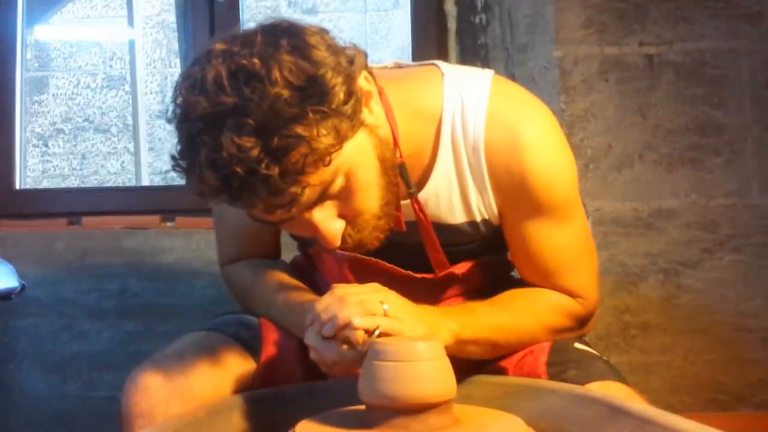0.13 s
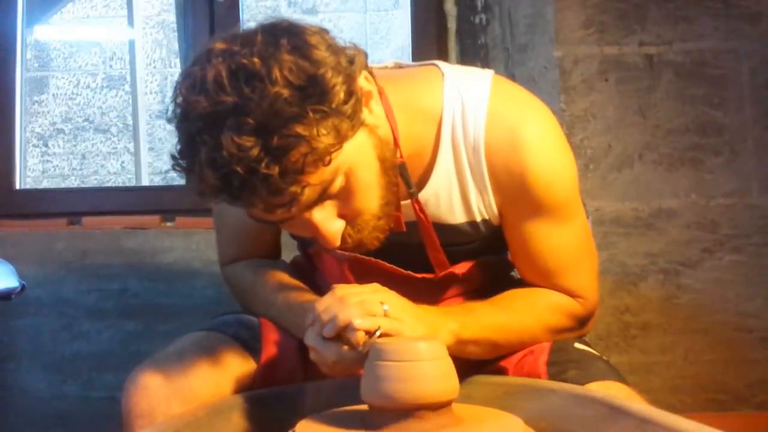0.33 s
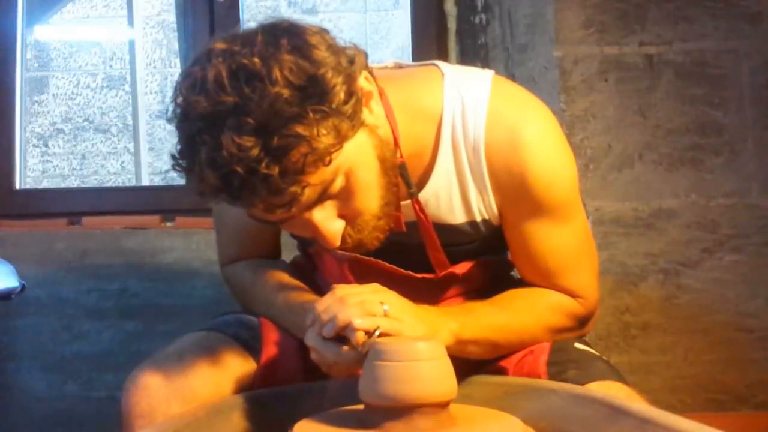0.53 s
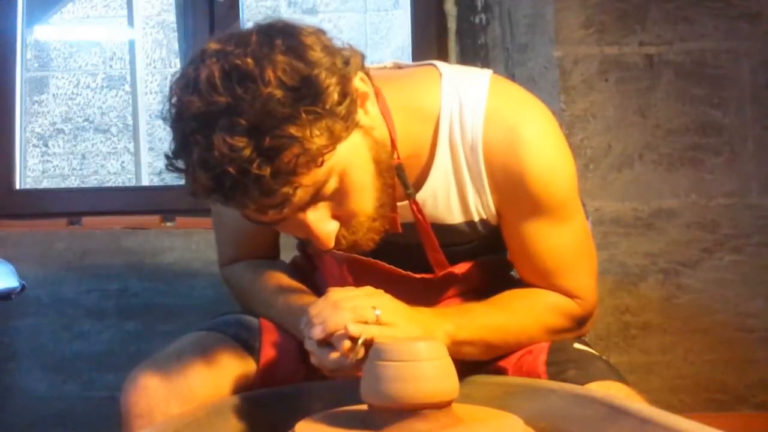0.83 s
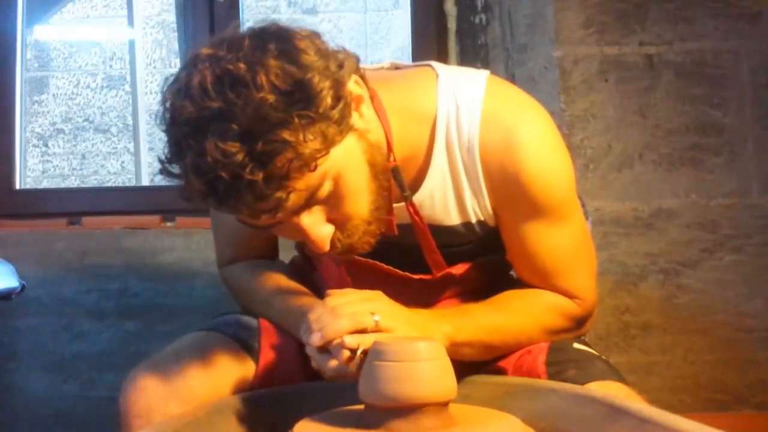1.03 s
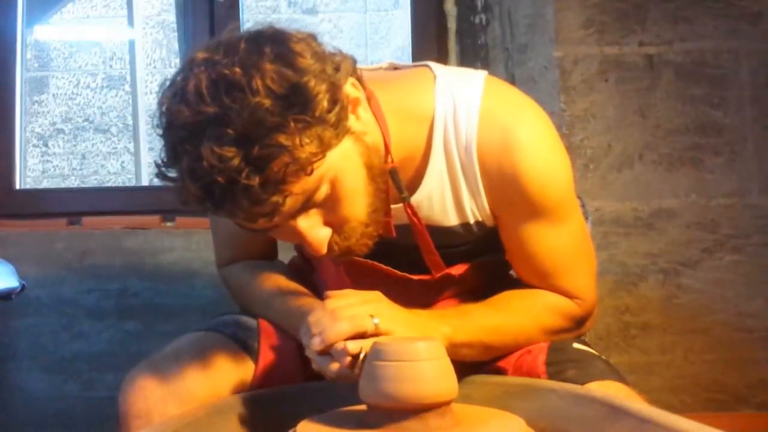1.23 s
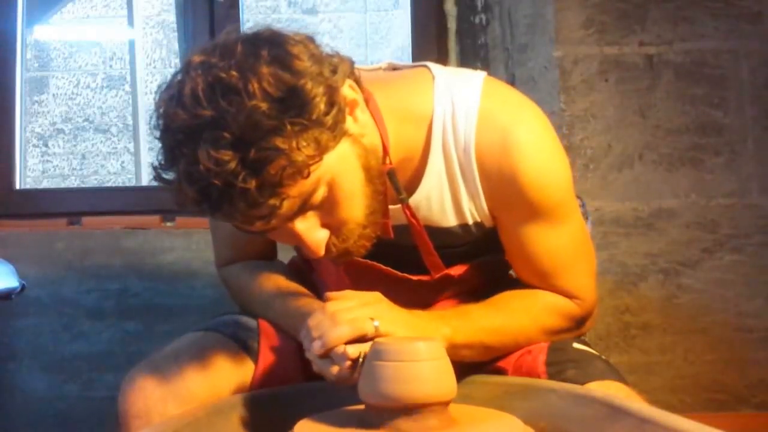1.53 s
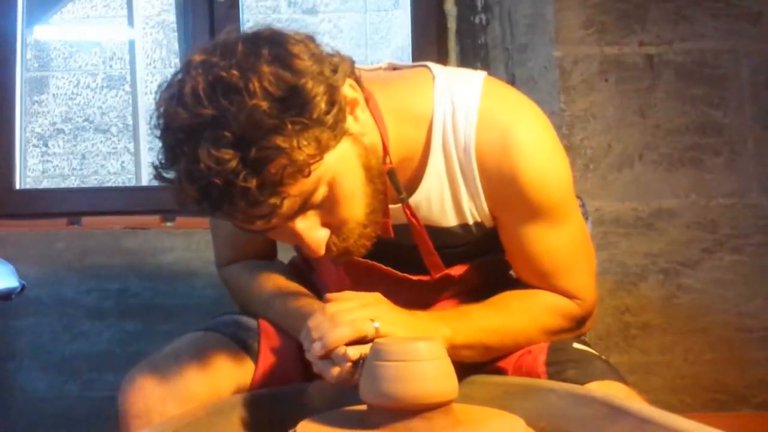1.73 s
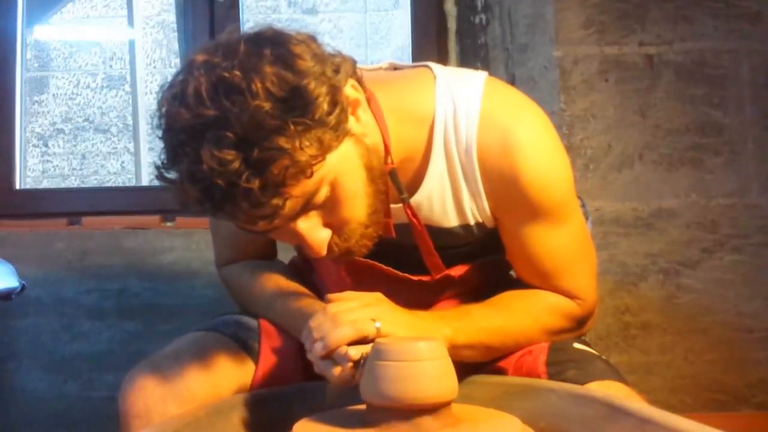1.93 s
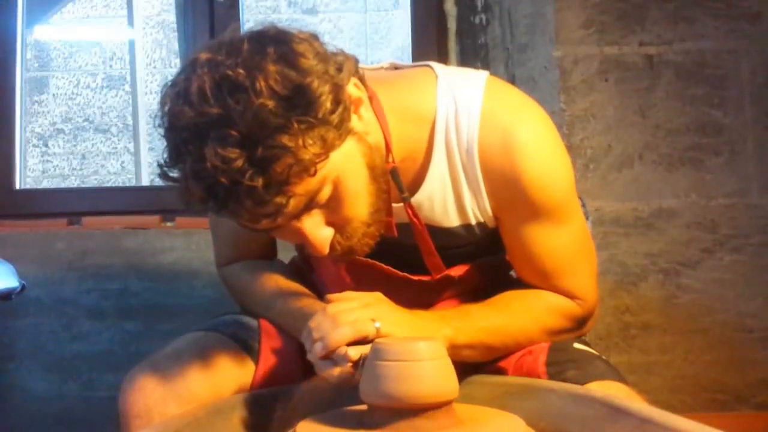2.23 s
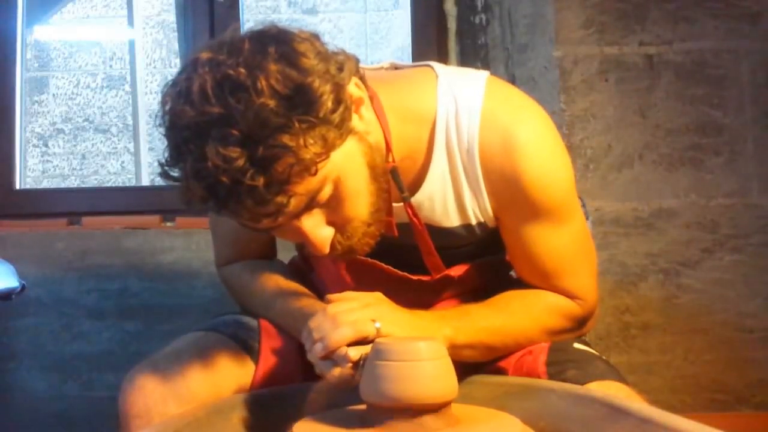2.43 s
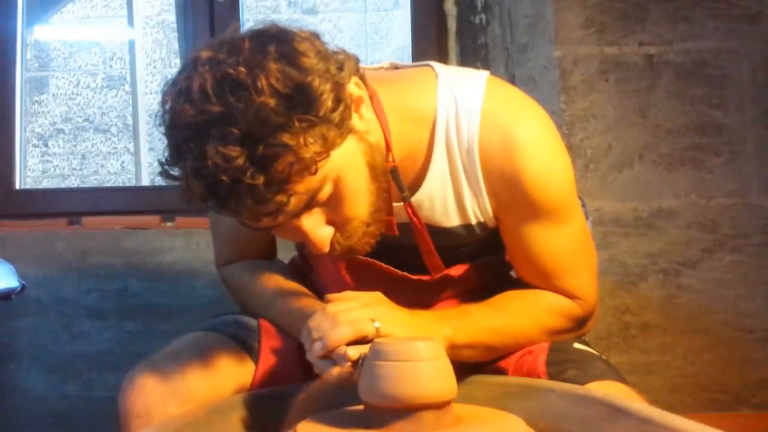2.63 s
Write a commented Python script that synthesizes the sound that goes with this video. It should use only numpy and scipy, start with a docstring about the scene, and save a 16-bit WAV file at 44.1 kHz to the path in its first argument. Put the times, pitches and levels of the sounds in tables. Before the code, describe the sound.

A steel tool scrapes gritty clay in two hissing strokes over a rumbling, humming electric potter's wheel

```python
"""In a small studio, a steel tool trims clay on an electric potter's wheel.
Noise shaped by resonances makes the wheel head rumble; now and then it judders, rubs hollowly or groans.
The drive hums and throbs in tones locked to the turn, and the motor whines in tones that bend with it.
Friction noise makes the tool hiss through gritty clay in two strokes, ringing at its own resonances;
in between it only skims."""
import sys
import numpy as np
from scipy import signal
from scipy.fft import rfft, irfft
from scipy.io import wavfile

SR = 44100
rng = np.random.default_rng(int(sys.argv[2]) if len(sys.argv) > 2 else 0)


def store_pcm(level_fs):
    """Save levels as 16-bit WAV."""
    pcm = np.round(np.clip(level_fs, -1, 1) * 32767).astype(np.int16)
    wavfile.write(sys.argv[1], SR, np.atleast_2d(pcm).T)


N = 123039
T = np.arange(N) / SR
HZ = np.maximum(np.arange(N // 2 + 1) * SR / N, 1)
TURN_S = .24   # one turn of the wheel
WHEEL_PAN_DB, RUMBLE_PAN_DB = -7.5, -6   # left level minus right level


def from_db(db):
    """Logarithmic level: decibels to amplitude gain."""
    return 10 ** (np.asarray(db) / 20)


def pan(db):
    """Level difference between the ears: left and right gains of unit mean power."""
    gains = from_db([[db / 2], [-db / 2]])
    return gains / np.sqrt(np.mean(gains ** 2))


def drift(rate_hz):
    """Low-passed random fluctuation: white noise through two equal poles, scaled to spread 1."""
    pole = np.exp(-2 * np.pi * rate_hz / SR)
    slow = signal.lfilter([1], [1, -2 * pole, pole * pole], rng.standard_normal(N + SR))
    slow = slow[SR:]   # drop the filter's start
    return slow / slow.std()


def over_time(points):
    """Piecewise-linear envelope: a two-column table joined over time."""
    return np.interp(T, *np.transpose(points))


def over_hz(points, axis=1):
    """Spectral envelope: one column of a table joined on a log-frequency axis."""
    points = np.array(points)
    return np.interp(np.log(HZ), np.log(points[:, 0]), points[:, axis])


def resonance(hz, width, db):
    """Resonance: power response of a steep-sided peak."""
    return from_db(db) ** 2 / (1 + 2 * ((HZ - hz) / width) ** 2) ** 2


def two_sided_resonances(rows):
    """Superposed resonances: their summed power on the left and on the right."""
    return sum(resonance(hz, width, [[left], [right]]) for hz, width, left, right in rows)


def bump(centre_s, spread_s):
    """Gaussian envelope: a smooth rise and fall with peak 1."""
    return np.exp(-((T - centre_s) / spread_s) ** 2 / 2)


def noise(power, likeness=0):
    """Interaural correlation: stereo noise of given power per Hz, from shared and opposed parts."""
    mid, side = rfft(rng.standard_normal((2, N)))
    opposed = side * np.array([[1], [-1]])
    both = np.sqrt(1 + likeness) * mid + np.sqrt(1 - likeness) * opposed
    return irfft(both * np.sqrt(power * SR) / 2, N)


def tone(hz, db):
    """Frequency modulation: a sine whose phase integrates its pitch, at a given rms level."""
    return np.sqrt(2) * from_db(db) * np.sin(2 * np.pi * np.cumsum(hz) / SR)


def twice_a_turn(peak_s):
    """Periodic modulation: a cosine that peaks twice in each turn."""
    return np.cos(2 * np.pi * 2 * (T - peak_s) / TURN_S)


# left-right likeness of the rumble and rubs: f/Hz, correlation
LIKENESS = [(70, 0), (160, 0.83), (400, 0.91), (700, 0.41), (1200, 0.45), (3000, 0)]
# broad rumble of the wheel head, before panning: f/Hz, level per Hz/dB
RUMBLE = [(20, -101), (48, -97), (85, -70.5), (125, -62.5), (190, -63), (260, -65), (480, -67), (680, -71),
          (1000, -74), (1300, -73), (1550, -85), (5000, -108)]
# resonances of the wheel's frame and pan: f/Hz, width/Hz, level per Hz/dB
FRAME = [(110, 4.2, -73), (297.5, 13.6, -60), (333.7, 7.1, -57.5), (363, 14.5, -60.5), (431.4, 57, -60),
         (528.2, 27.4, -57.5), (597, 12, -65.5), (864, 34, -69)]
SWELL_DB, SWELL_PEAK_S = 1.18, 0.048


def rumble():
    """Resonant filtering: broadband noise rings the frame and swells twice a turn."""
    power = from_db(over_hz(RUMBLE)) ** 2 + sum(resonance(*row) for row in FRAME)
    return noise(power, over_hz(LIKENESS)) * from_db(SWELL_DB * twice_a_turn(SWELL_PEAK_S))


# rubs of the turning pot: t/s, spread/s, gain/dB
RUBS = [(.04, 0.021, 5), (.893, 0.0099, 3), (1.135, 0.024, 0.5), (2.069, 0.022, 5), (2.191, 0.025, 4.5),
        (2.575, 0.03, 1)]
# hollow resonances they excite, before that gain: f/Hz, width/Hz, level per Hz/dB
RUB_RINGS = [(528, 53, -58), (852, 140, -64.5)]


def rubs():
    """Friction-excited resonance: short swells of noise in two hollow bands."""
    rubbing = sum(from_db(db) * bump(s, spread) for s, spread, db in RUBS)
    return rubbing * noise(sum(resonance(*row) for row in RUB_RINGS), over_hz(LIKENESS))


# judders, before panning: t/s, first knock's peak level/dB, decay time/s
JUDDERS = [(.022, -20, 0.07), (.403, -23.5, 0.013), (.502, -24, 0.029), (.708, -26, 0.012),
           (.883, -23.5, 0.011), (.969, -26, 0.05), (1.902, -25.5, 0.023), (2.033, -21, 0.0067),
           (2.062, -19, 0.023), (2.18, -30, .016), (2.412, -22, 0.052), (2.55, -26.5, 0.051),
           (2.651, -22, 0.014)]
KNOCK_GAP_S, KNOCK_UNEVEN, KNOCK_BAND_HZ = .0075, 0.1767, (250, 510)   # unevenness: log spread of gaps


def judders():
    """Repeated impact: dying runs of unevenly spaced clicks excite a dull band."""
    clicks = np.zeros(N + SR)
    for s, db, decay in JUDDERS:
        gaps = KNOCK_GAP_S * np.exp(KNOCK_UNEVEN * rng.standard_normal(size=14))
        after = np.cumsum(gaps) - gaps[0]
        clicks[((s + after) * SR).astype(int)] += from_db(db) * np.exp(-after / decay)
    body = signal.butter(2, KNOCK_BAND_HZ, "band", fs=SR, output="sos")
    knock = signal.sosfilt(body, signal.unit_impulse(SR // 20))
    return signal.fftconvolve(clicks, knock / np.abs(knock).max())[:N]


# groan late in the second stroke, before panning: t/s, level/dB
GROAN_LEVEL = [(1.88, -75), (1.97, -37), (2.17, -47), (2.33, -64), (2.46, -44), (2.62, -54)]
GROAN_HZ, GROAN_JITTER_HZ = 108.9, 5.1


def groan():
    """Random frequency modulation: a low tone with unsteady pitch."""
    return tone(GROAN_HZ + GROAN_JITTER_HZ * drift(9.8), over_time(GROAN_LEVEL))


RUMBLE_ROUGH_DB, RUMBLE_ROUGH_HZ = 0.98, 71


def wheel_head():
    """Superposition: rumble and rubs share one random roughness; judders and groan add to them."""
    roughness = from_db(RUMBLE_ROUGH_DB * drift(RUMBLE_ROUGH_HZ))
    return pan(RUMBLE_PAN_DB) * ((rumble() + rubs()) * roughness + judders() + groan())


# one turn of hum: t/s into the turn, level/dB before HUM_DB, f/Hz before its mean moves to HUM_ORDER
HUM = [(0, -37, 141), (.025, -31.5, 148), (.07, -31.5, 150), (.1, -33, 155), (.125, -38.5, 152),
       (.15, -31, 150), (.175, -27, 152), (.198, -37, 148), (.213, -45, 185), (.226, -34.5, 140)]
# orders are cycles per turn
HUM_ORDER, HUM_DB, HUM_WAVER_DB = 36, 1, 0.93


def hum():
    """Periodic modulation: level and pitch bend alike on every turn, with a random waver in level."""
    s, db, hz = np.transpose(HUM)
    level = np.interp(T, s, db, period=TURN_S)
    pitch = np.interp(T, s, hz, period=TURN_S)
    centred_pitch = pitch - pitch.mean() + HUM_ORDER / TURN_S
    return tone(centred_pitch, HUM_DB + level + HUM_WAVER_DB * drift(16))


THROB_ORDERS, THROB_DB = (15, 17), (-52, -47)
THROB_PEAK_S, THROB_WAVER_DB = 0.098, 2.8


def throb():
    """Beating: two low orders, two cycles per turn apart, reinforce each other twice a turn."""
    out = 0
    for order, db in zip(THROB_ORDERS, THROB_DB):
        gain = np.sqrt(2) * from_db(db + THROB_WAVER_DB * drift(4.4))
        out = out + gain * np.cos(2 * np.pi * order * (T - THROB_PEAK_S) / TURN_S)
    return out


# the drive softens a little as the work goes on: t/s, gain/dB
DRIVE_LEVEL = [(1.2, -0.3), (2, -1.5)]
UPPER_ORDERS, UPPER_DB = (42, 56), (-44.5, -53)


def drive():
    """Rotational orders: hum, throb and two steady upper tones are locked to the turn."""
    upper = sum(tone(np.full(N, order / TURN_S), db) for order, db in zip(UPPER_ORDERS, UPPER_DB))
    return pan(WHEEL_PAN_DB) * (hum() + throb() + upper) * from_db(over_time(DRIVE_LEVEL))


# bands of motor rasp: f/Hz, width/Hz, left level per Hz/dB, right level per Hz/dB
MOTOR_RINGS = [(1917, 51, -71.5, -65.5), (3533, 51, -75, -67), (1347, 54, -75.5, -70.5)]
# motor whines: f/Hz, level/dB, jitter/Hz, swing/Hz, flutter/dB, left-right difference/dB, right lag/s
WHINES = [(1943, -51.5, 14.07, 14.7, -1.5, 1, 0.0012), (3486, -54, 11.7, 4.8, 0.5, -1, 0),
          (1053, -56.5, 2.74, 1.1, 1, -3, 0)]
SAG_S = 0.0625   # time into the turn at which the whines are lowest


def whines():
    """Frequency modulation: thin motor tones sag twice a turn inside narrow bands of rasp."""
    out = noise(two_sided_resonances(MOTOR_RINGS))
    for hz, db, jitter, swing, flutter_db, pan_db, lag in WHINES:
        pitch = hz + jitter * drift(62) - swing * twice_a_turn(SAG_S)
        left = tone(pitch, db + flutter_db * drift(26))
        right = np.interp(T - lag, T, left)
        out = out + pan(pan_db) * np.array([left, right])
    return out


# thin tone of the wheel, before panning: t/s, level/dB
SING_LEVEL = [(.95, -60), (1.14, -43.5), (1.25, -54), (1.65, -50.5), (1.9, -53), (2.6, -59), (2.7, -44),
              (2.79, -53)]
SING_HZ, SING_JITTER_HZ = 983, 5.07


def singing():
    """Amplitude modulation: a thin tone of the wheel comes and goes, its pitch jittering."""
    pitch = SING_HZ + SING_JITTER_HZ * drift(21.2)
    return pan(RUMBLE_PAN_DB) * tone(pitch, over_time(SING_LEVEL))


REFLECTION_GAIN, REFLECTION_SPAN_S = 0.5, .008


def near_path(count=8):
    """Comb interference: response of direct sound plus early reflections, of unit mean power."""
    delays = rng.uniform(0, REFLECTION_SPAN_S, (count, 1))
    path = 1 + REFLECTION_GAIN * np.exp(-2j * np.pi * HZ * delays).sum(axis=0)
    return path / np.sqrt(np.mean(np.abs(path) ** 2))


NEAR_SHARE = 0.38   # share of power on the near paths; the rest is diffuse room sound


def clay_hiss(power, paths):
    """Direct and diffuse fields: friction noise of given power per Hz, part shared, part independent."""
    white = rfft(rng.standard_normal((3, N)))
    near, diffuse = paths * white[2], white[:2]
    both = np.sqrt(NEAR_SHARE) * near + np.sqrt(1 - NEAR_SHARE) * diffuse
    return irfft(both * np.sqrt(power * SR / 2), N)


def side_powers(colour):
    """Power spectral density: left and right power per Hz from a table of hiss."""
    return from_db([over_hz(colour, axis=1), over_hz(colour, axis=2)]) ** 2


# pressure of the tool in each stroke, as a gain on its hiss: t/s, gain/dB
FIRST_STROKE = [(0, 2), (.03, -2.5), (.1, 0), (.18, 1.5), (.3, -1.5), (.39, -2.5), (.56, -2.5), (.68, 1),
                (.78, -1), (.83, -13), (.95, -50)]
SECOND_STROKE = [(1.2, -35), (1.33, -9), (1.4, -5), (1.54, -5.5), (1.63, -3.5), (1.79, -3), (1.815, -6),
                 (1.93, -3), (2.02, -2), (2.1, -0.5), (2.27, -0.5), (2.44, -2), (2.56, -0.5), (2.71, 0),
                 (2.79, -2)]
# hiss of the clay, for the strokes before that gain: f/Hz, left level per Hz/dB, right level per Hz/dB
SKIM_HISS = [(1200, -101, -90), (2280, -84, -76.5), (4660, -83, -79), (6000, -74.5, -75),
             (7760, -88, -69.5), (8730, -93, -81.5), (10720, -105, -84.5), (13600, -122, -110)]
FIRST_HISS = [(1210, -86, -80.5), (2600, -81, -74), (4450, -80.5, -76), (5630, -67, -70.5),
              (6500, -80, -73), (7850, -86, -65.5), (8600, -90, -72.5), (9900, -90, -71.5),
              (11100, -102, -87.5), (12700, -114, -85.5), (14500, -115, -98)]
SECOND_HISS = [(1200, -91, -77.5), (2500, -77, -76), (4570, -82, -75), (5940, -69, -69), (6600, -77, -77),
               (8640, -85, -67), (9300, -84, -73.5), (10200, -99, -84), (11300, -101, -82),
               (12200, -104, -81), (13900, -115, -98)]
# the tool's resonances under each grip, before the pressure's gain:
# f/Hz, width/Hz, left level per Hz/dB, right level per Hz/dB
FIRST_GRIP = [(2570, 130, -72, -66.5), (5440, 99, -70, -65), (7100, 170, -65, -55.5),
              (7960, 500, -80, -65.5)]
SECOND_GRIP = [(2570, 110, -81, -67), (5376, 150, -57.5, -62), (5760, 220, -73, -65.5),
               (7050, 270, -77, -57.5), (7240, 550, -78, -61.5), (9560, 160, -89, -67),
               (10170, 510, -87, -67.5)]
# the edge sings briefly as it bites:
# t/s, spread/s, f/Hz, width/Hz, left level per Hz/dB, right level per Hz/dB
BITES = [(.662, 0.024, 5200, 420, -62.5, -63), (1.492, 0.057, 5930, 193, -63, -62.5),
         (1.68, 0.14, 8950, 216, -88, -67), (1.657, 0.017, 7100, 197, -69, -56),
         (2.2, .09, 12540, 595, -100, -73), (2.58, 0.15, 12640, 600, -97, -75)]
RING_GROWTH = 1.86   # dB of ringing for each dB of hiss
RIGHT_LEAD_S = .000304   # the tool is a little nearer to the right side
GRIT_DB, GRIT_HZ, CHATTER_DB, CHATTER_HZ = 0.88, 480, .5, 24


def tool():
    """Friction-driven resonance: skimming and two strokes, ringing more with pressure, rough with grit."""
    lead = np.exp(2j * np.pi * HZ * RIGHT_LEAD_S)
    paths = np.array([near_path(), near_path() * lead])
    cut = clay_hiss(side_powers(SKIM_HISS), paths)
    strokes = ((FIRST_STROKE, FIRST_HISS, FIRST_GRIP), (SECOND_STROKE, SECOND_HISS, SECOND_GRIP))
    for stroke, colour, grip in strokes:
        pressure_db = over_time(stroke)
        hiss = clay_hiss(side_powers(colour), paths)
        ringing = clay_hiss(two_sided_resonances(grip), paths)
        cut = cut + from_db(pressure_db) * hiss + from_db(RING_GROWTH * pressure_db) * ringing
    for s, spread, *ring in BITES:
        cut = cut + bump(s, spread) * clay_hiss(two_sided_resonances([ring]), paths)
    return cut * from_db(GRIT_DB * drift(GRIT_HZ) + CHATTER_DB * drift(CHATTER_HZ))


def scene():
    """Superposition: the wheel and the tool sound together."""
    return wheel_head() + drive() + whines() + singing() + tool()


def record(dry):
    """Low-pass filtering: an elliptic filter cuts the top steeply at 13.8 kHz."""
    return signal.sosfilt(signal.ellip(10, .2, 80, 13800, fs=SR, output="sos"), dry)


dry = scene()
out = record(dry)
store_pcm(out)
```